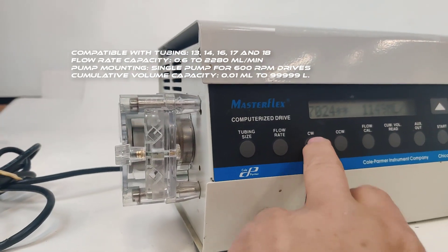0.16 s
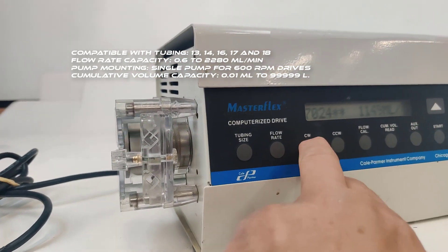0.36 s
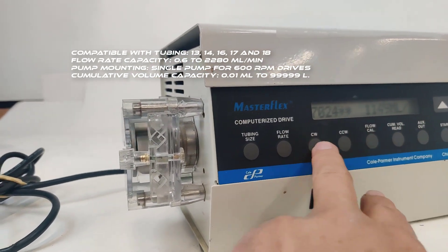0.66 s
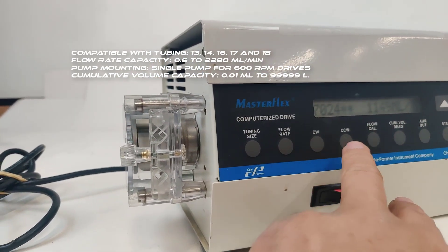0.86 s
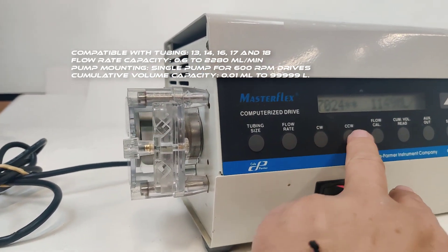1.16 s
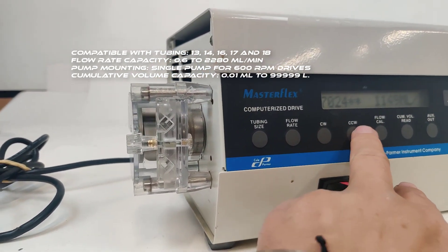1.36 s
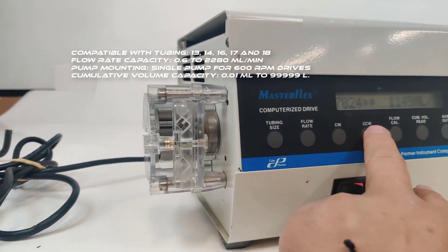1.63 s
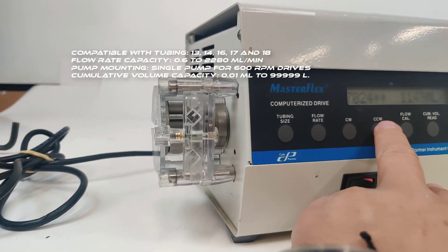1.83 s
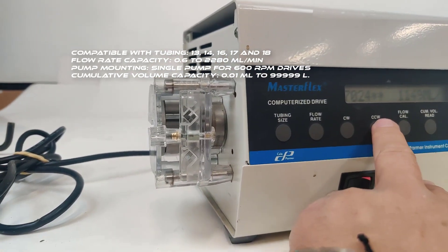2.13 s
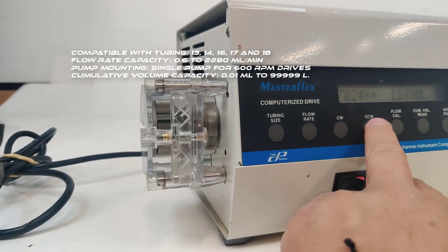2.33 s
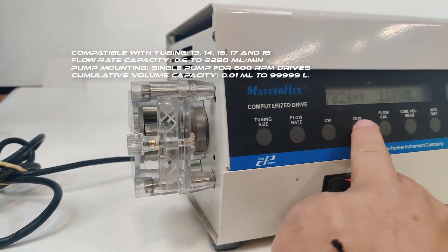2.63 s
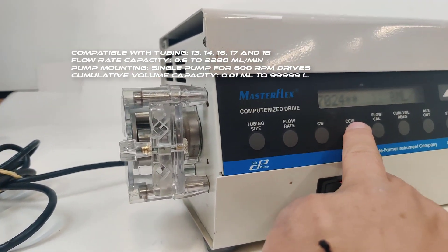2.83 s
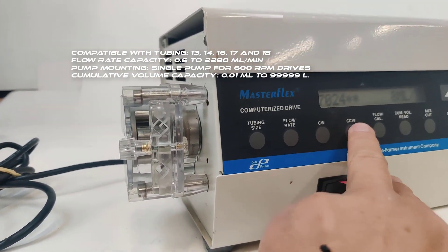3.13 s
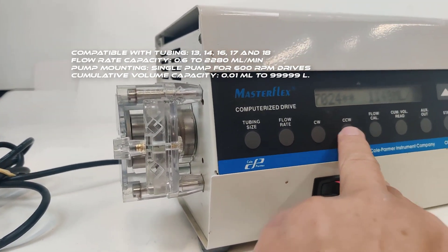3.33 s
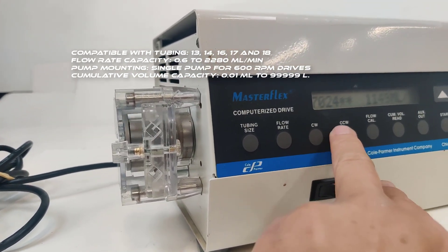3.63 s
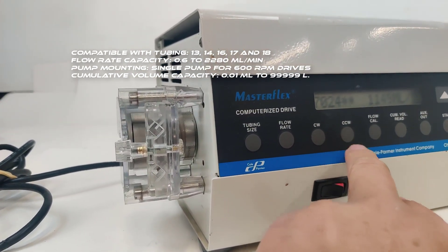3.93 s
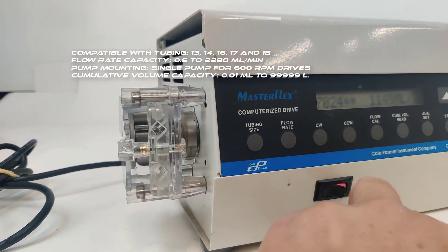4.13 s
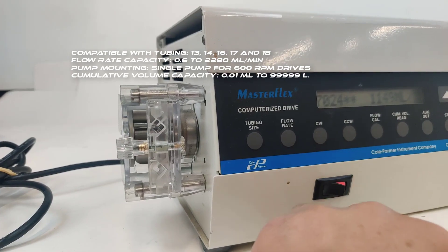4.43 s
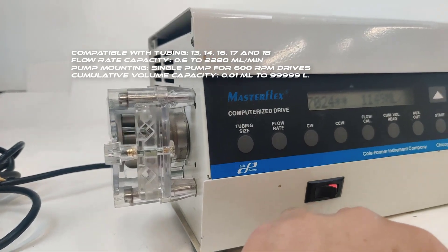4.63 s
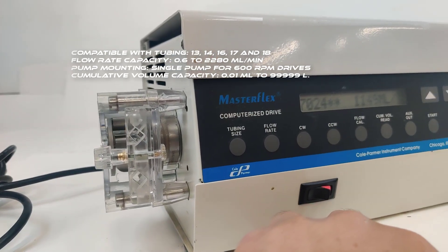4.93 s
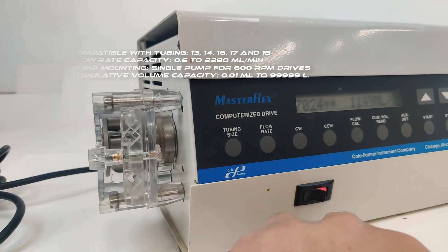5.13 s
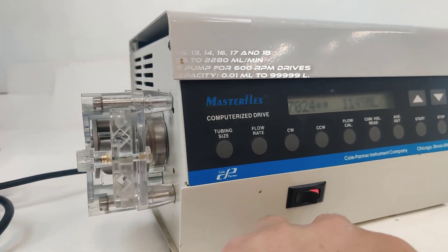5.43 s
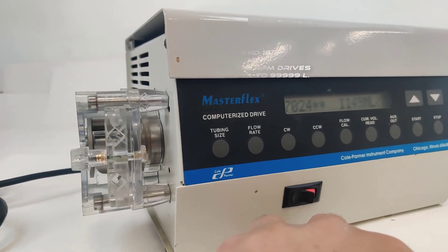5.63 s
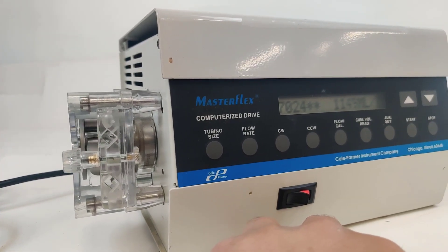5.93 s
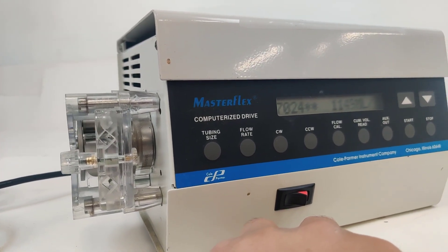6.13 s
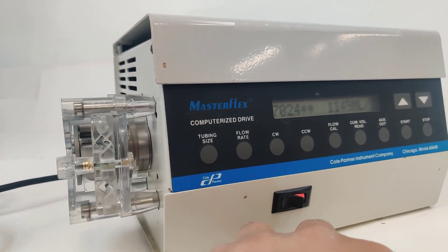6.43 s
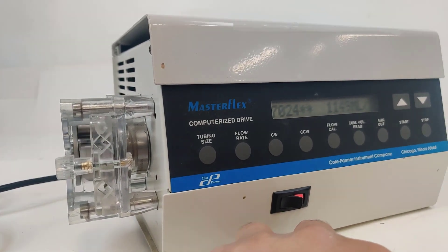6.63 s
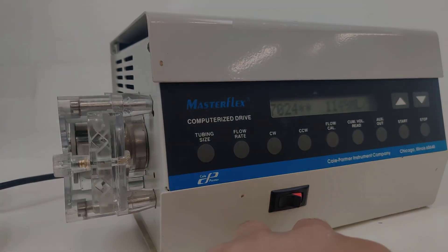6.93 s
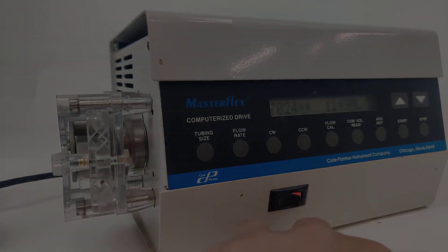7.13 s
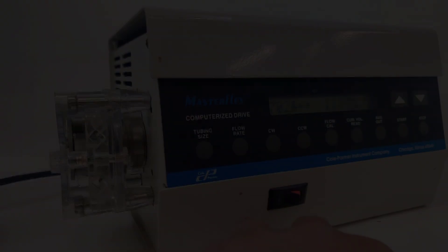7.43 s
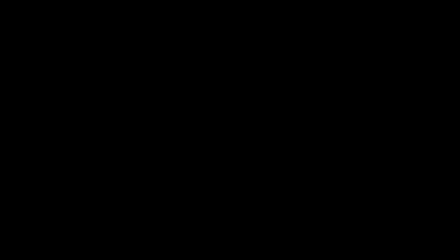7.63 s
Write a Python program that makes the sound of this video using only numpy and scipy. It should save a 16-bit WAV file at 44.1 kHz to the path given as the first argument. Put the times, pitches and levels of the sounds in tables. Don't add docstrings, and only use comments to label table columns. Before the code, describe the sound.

A small geared pump motor whines and rattles steadily, brakes with a metallic clunk, pauses, then restarts, rising in pitch to a steady run.

```python
import sys
import numpy as np
from scipy import signal
from scipy.fft import rfft, irfft, next_fast_len
from scipy.io import wavfile
from scipy.ndimage import uniform_filter1d, minimum_filter1d, map_coordinates

SR = 44100
rng = np.random.default_rng(int(sys.argv[2]) if len(sys.argv) > 2 else 0)


def gain_from_decibels(decibels):
    exponent = np.asarray(decibels, float) / 20
    return 10 ** exponent


def wrap_up_sound(samples):
    columns = np.atleast_2d(samples).T
    tamed = np.clip(columns, -1, 1)
    steps = np.round(tamed * 32767).astype(np.int16)
    wavfile.write(sys.argv[1], SR, steps)


N = 343253
T = np.arange(N) / SR
WAY = (T > 3).astype(int)
BRAKE, START = 2.635, 3.337
SHAFT_HZ, BALL_HZ = 38.883, 100.485
LOOSE = 0.62


def unit(x):
    return x / np.sqrt(np.mean(x ** 2) + 1e-20)


def along(points, hz):
    f, v = np.transpose(points)
    return np.interp(np.log(hz + 1), np.log(f + 1), v)


def wobble(rate, size=N):
    knots = rng.standard_normal(int(size * rate / SR) + 4)
    return map_coordinates(knots, [np.arange(size) * rate / SR])


def filtered(x, response):
    m = next_fast_len(N + 8192)
    return irfft(rfft(x, m) * response(np.fft.rfftfreq(m, 1 / SR)), m)[..., :N]


def swell(s, rise_s, fall_s):
    return np.exp(-np.where(T < s, ((T - s) / rise_s) ** 2, (T - s) / fall_s))


def put(track, s, sound):
    track[round(s * SR):][:len(sound)] += sound


def motion():
    # time in seconds, share of full speed.
    run_up = [
        (3.36, .03),
        (3.7, .34),
        (4.03, .68),
        (4.27, .95),
        (4.36, .99),
        (4.5, 1),
    ]
    speed = np.where(WAY, np.interp(T, *np.transpose(run_up)), 1)
    run = np.cumsum(speed) / SR
    return speed, np.where(WAY, run - run[-1], run)


def case(hz, way):
    # frequency in Hz, width in Hz, forward lift in dB, reverse lift in dB.
    modes = [(145, 8.4, 19.5, 22), (244.7, 39, 9.5, 12), (405, 26, 4, 10.5), (524, 32, 4, 6.5),
             (642.5, 21, 9, 12.5), (767, 19, 10, 9), (864, 22, -2.5, 8.5), (1022, 29, 7.5, 7),
             (1148, 16, 7, 10), (1827, 13, 4.5, 11.5), (1933, 7.6, 12.5, 9.5), (2196, 33, 11, 8),
             (2350, 35, 6.5, 14), (2530, 250, 6, 3.5), (4570, 75, 10.5, 11.5), (5400, 59, -7, -11.5),
             (3337, 56, -3, 8.5), (3550, 160, -1, 4.5), (3843, 28, 9.5, 12), (4817, 93, 11, 13.5),
             (5174, 63, 13, 16), (5470, 110, -16, 11.5), (6980, 230, 6.5, 1.5), (8290, 350, 5.5, 5.5),
             (10500, 700, 4, 6.5), (11770, 690, 8, 5), (5930, 190, -1, -4), (13870, 1400, 3.5, 4)]
    power = 1
    for mode_hz, width_hz, *lift_db in modes:
        power = power + gain_from_decibels(2 * lift_db[way]) / (1 + (2 * (hz - mode_hz) / width_hz) ** 2)
    return np.sqrt(power)


def hum(level_db=0.0, fizz_db=-58.5):
    mains_hz = 120.08
    # multiple of the mains line, forward level in dB, reverse level in dB.
    harmonics = [(1, -63, -69), (2, -49, -51), (3, -49, -50), (4, -42, -42), (5, -48, -46), (8, -60, -62)]
    stall_db = [-6, -6, -1, -8, -12, -19]
    slow = 1 - motion()[0]
    buzz = np.zeros(N)
    for (k, *db), stall in zip(harmonics, stall_db):
        buzz += gain_from_decibels(np.array(db)[WAY] + stall * slow) * np.cos(2 * np.pi * (k * mains_hz * T + rng.random()))
    buzz *= np.sqrt(2) * gain_from_decibels(level_db + 0.41 * wobble(9.6) + 0.66 * slow * wobble(23.0))
    chops = rng.standard_normal(N) * (1 + .5 * np.cos(2 * np.pi * mains_hz * T))
    plates = lambda hz: 1 / (1 + ((hz - 3450) / 210) ** 4) + .35 / (1 + ((hz - 1300) / 600) ** 4)
    fizz = unit(filtered(chops, plates))
    switched_on = np.clip((T - START) / 0.034, 0, 1)
    switched_off = gain_from_decibels(-60 * np.maximum(T - BRAKE, 0) / 0.062)
    return np.where(WAY, switched_on, switched_off) * (buzz + gain_from_decibels(fizz_db) * fizz)


def lines(unsteady_db=.5, level_db=-.5, weakest_db=-65):
    # multiple of the part's rate, forward level in dB, reverse level in dB.
    shaft = [(1, -52, -55), (10, -45, -42), (20, -51, -46), (60, -55, -48), (63, -70, -55), (79, -64, -60),
             (86, -68, -56), (88, -64, -63), (99, -70, -63), (119, -70, -64), (133, -70, -63),
             (139, -70, -64), (140, -70, -64), (142, -70, -64), (91, -53, -62), (92, -56, -69),
             (94, -58, -68), (96, -59, -72), (100, -68, -55), (101, -70, -57), (115, -69, -60),
             (118, -69, -60), (124, -68, -60), (127, -67, -57), (128, -70, -62)]
    balls = [(4, -39, -36), (5, -49, -49), (6, -52, -58), (7, -60, -69), (18, -60, -62), (19, -58, -62),
             (23, -55, -59)]
    cage = [(18, -55, -52), (19, -52, -56), (20, -58, -60), (22, -53, -64), (23, -48, -52), (25, -51, -58),
            (26, -53, -60), (27, -56, -66)]
    gear = [(3, -36, -34), (4, -49, -60)]
    rotor = [(24, -64, -58), (49, -54, -63), (50, -56, -67), (66, -58, -54), (81, -58, -56), (83, -59, -59),
             (85, -55, -55), (86, -57, -54), (105, -49, -56), (106, -51, -41), (107, -60, -48),
             (108, -57, -47), (109, -53, -46)]
    # frequency at full speed in Hz, forward level in dB,
    # reverse level in dB.
    drive_lines = [(148.6, -60, -64), (226.7, -57, -65), (343.3, -55, -56), (364.9, -65, -57), (370.9, -59, -56),
                   (395.55, -54, -53), (396.9, -50, -60), (408.9, -52, -70), (403.7, -70, -51), (406.8, -54, -52),
                   (412.8, -50, -60), (478.6, -61, -51), (629, -50, -47), (664, -57, -60), (858.4, -54, -55),
                   (1010.9, -61, -65), (1022.9, -66, -58), (1791.6, -61, -59), (1849.9, -57, -67),
                   (1900.1, -50, -59), (1928.8, -55, -61), (2037.2, -57, -57), (2065.3, -65, -52),
                   (2202.2, -61, -59), (2270.8, -61, -52), (2338, -70, -48), (2368.7, -63, -54),
                   (2475.2, -70, -55), (2885.9, -56, -65), (2612.5, -56, -59), (2770.8, -60, -69),
                   (2536.2, -62, -59), (2193.3, -55, -58),
                   (234.5, -59, -70), (462.5, -70, -58), (515, -58, -56), (547, -70, -59), (706, -62, -70),
                 (752.1, -61, -70), (783.6, -70, -63), (963, -64, -70), (1058.7, -70, -64),
                 (1320.8, -63, -70), (1411.6, -70, -63), (1435.2, -64, -70), (1794.6, -61, -70),
                 (1812.5, -62, -70), (1880.6, -70, -63), (2124.8, -62, -62), (2173.7, -70, -61),
                 (2309.7, -70, -51), (2340, -57, -70), (2447.8, -61, -70), (2455.3, -60, -70),
                 (2748.1, -70, -64), (2871.3, -63, -70), (3110.5, -64, -70), (3172.6, -70, -64),
                 (3362.2, -62, -61), (3661.2, -63, -70), (3810.4, -63, -70)]
    angles = {"balls": (.075, -.03), "gear": (.097, -.076), "shaft": (-.041, .031), "rotor": (.09, .21)}
    cage_hz, gear_hz, rotor_hz = 14.3, 136.78, 5.982
    gear_slip_hz = .044
    gear_warms_db_per_s = 2.2
    warms_db_per_s = 0.28
    radiates_hz = 265

    speed, turning = motion()
    turning = turning + 0.0043 * (1 - speed) * wobble(30)
    grid = np.arange(6000.) + 1
    lift = case(grid, way=1) / (1 + (radiates_hz / grid) ** 4)
    sway = [gain_from_decibels(unsteady_db * wobble(3.36) + 3.3 * (1 - speed) * wobble(20)) for _ in range(3)]
    parts = [(shaft, SHAFT_HZ, 0, "shaft"), (balls, BALL_HZ, 0, "balls"), (cage, BALL_HZ, cage_hz, 0),
             (gear, gear_hz, 0, "gear"), (rotor, rotor_hz, 0, "rotor"), (drive_lines, 1, 0, 0)]
    out = np.zeros(N)
    for way, running in enumerate((T < BRAKE + .15, T > START)):
        first = np.argmax(running)
        on = slice(first, first + running.sum())
        for table, base, offset, name in parts:
            for i, row in enumerate(table):
                if row[1 + way] <= weakest_db:
                    continue
                is_gear = name == "gear"
                hz = row[0] * (base - gear_slip_hz * way * is_gear) + offset
                start = row[0] * angles[name][way] if name else rng.random()
                gain = gain_from_decibels(row[1 + way]) * lift[(hz * speed[on]).astype(int)] / lift[int(hz)]
                if is_gear and not way:
                    gain = gain * gain_from_decibels(gear_warms_db_per_s * (T[on] - 1.6))
                out[on] += gain * sway[i % len(sway)][on] * np.cos(2 * np.pi * (hz * turning[on] + start))
    stop = gain_from_decibels(-60 * np.maximum(T - BRAKE, 0) / 0.11)
    warming_db = warms_db_per_s * (T - np.where(WAY, 6, 1.3))
    return np.sqrt(2) * gain_from_decibels(level_db + warming_db) * out * np.where(WAY, speed ** 2.7, stop)


def effort():
    # drone, body, whine and hiss in dB.
    full_db = [
        (-45, -43.5, -33.5, -50),
        (-46, -44.5, -34.5, -48),
    ]
    # time in seconds, jump in dB.
    jolts = [
        (2.08, 4),
        (2.624, 4),
        (3.606, 5),
        (3.942, 1.5),
        (4.208, 3.5),
        (6.39, 5),
    ]
    column = lambda values: np.array(values)[:, None]
    grows = column((0.78, 2, 1.25, 0.96))
    coast_db_per_s = column((169, 190, 194, 150))
    jolt_share = column((.3, 1.6, 0.57, 0.21))
    slack_db, catch_s = column((5, 7.5)), 3.97
    hiss_late_db = 8

    speed = motion()[0]
    jolt_db = sum(db * swell(s, rise_s=0.016, fall_s=0.017) for s, db in jolts)
    rising_db = grows * 20 * np.log10(np.minimum(speed / LOOSE, 1))
    rising_db[2:] -= slack_db * WAY * np.clip((catch_s - T) / 0.12, 0, 1)
    rising_db[3] -= hiss_late_db * (1 - speed) * (T > catch_s)
    falling_db = coast_db_per_s * np.maximum(T - BRAKE, 0) * (1 - WAY)
    return np.transpose(full_db)[:, WAY] + rising_db - falling_db + jolt_share * jolt_db


def rattle():
    # frequency in Hz, density in dB per Hz.
    forward = [(88, -65), (150, -27.5), (314, -10.5), (404, -5), (550, -14.5), (631, -9.5), (708, -17.5),
               (1270, -17), (2270, -16), (3690, -15.5), (4220, -26.5), (5030, -27.5), (5990, -36.5),
               (11800, -54), (15500, -53)]
    reverse = [(88, -68), (150, -29), (314, -14.5), (404, -8), (550, -15), (631, -9), (708, -19.5),
               (930, -21), (1600, -17.5), (2360, -18), (2920, -17.5), (5030, -28.5), (5990, -34),
               (10500, -49.5), (15500, -57.5)]
    cover_hz = 6000
    whine_in_s, whine_late_db = 3, 7
    drone_db, body_db, mid_db, hiss_db = effort()
    turning = motion()[1]
    beat = lambda hz, shift: np.cos(2 * np.pi * (hz * turning + shift))
    under = lambda hz, edge_hz: 1 / (1 + (hz / edge_hz) ** 8)
    clatter = beat(13.3, .15) + .6 * beat(6.6, .1) + 1.2 * wobble(25) + 1.6 * wobble(200)
    spin = 0.75 * beat(SHAFT_HZ, 0.11) + 0.75 * beat(2 * SHAFT_HZ, .3)
    late_db = whine_late_db * WAY * np.clip((whine_in_s - T) / 0.066, 0, 1)
    noise = rng.standard_normal((2, N))
    out = np.zeros((2, N))
    for way, spectrum in enumerate((forward, reverse)):
        shaken = filtered(noise, lambda hz: gain_from_decibels(along(spectrum, hz)) * case(hz, way))
        drone = filtered(shaken, lambda hz: under(hz, 762))
        body = filtered(shaken, lambda hz: under(hz, 1795) - under(hz, 738))
        whine = filtered(shaken, lambda hz: under(hz, 4570) - under(hz, 1690))
        cover = filtered(shaken, lambda hz: under(hz, cover_hz) - under(hz, 4650))
        hiss = filtered(shaken, lambda hz: 1 - under(hz, cover_hz))
        ball_db = (1.6, .3)[way] * beat(BALL_HZ, 0)
        part = drone / np.std(body) * gain_from_decibels(drone_db + 0.8 * wobble(14))
        part += unit(body) * gain_from_decibels(body_db + .5 * clatter)
        part += unit(whine) * gain_from_decibels(mid_db - 5.0 - late_db + .5 * clatter + ball_db)
        part += cover / np.std(whine) * gain_from_decibels(mid_db - 4.5 + 0.55 * clatter + spin)
        part += unit(hiss) * gain_from_decibels(hiss_db - 0.5 + .5 * clatter + spin)
        out += (WAY == way) * part
    return out * np.interp(T, [2.68, 2.76, START, START + 0.024], [1, 0, 0, 1])


def bench_rumble():
    # frequency in Hz, density in dB per Hz.
    bench = [(8.8, -32), (15, -4), (48, -3.5), (64, -3), (113, -11), (152, -6), (198, -21), (231, 3),
             (300, -3), (390, -33), (660, -120)]
    # time in seconds, lift over the rumble in dB (negative
    bumps = [(.24, 2.5), (.68, 6), (1.06, 8), (1.4, 8), (1.53, 18.5), (1.68, 17), (2.39, 0), (2.64, 6),
             (2.82, 2), (2.98, -1), (3.11, 4), (3.2, -6), (3.55, 8), (3.8, 7), (3.93, -2), (4.3, 6),
             (4.55, 7), (4.72, 5), (4.89, -3), (5.72, 6)]
    on_db, off_db, settle_s, sway_db, bump_s = -55, -65.5, 0.46, 1, 0.053
    noise = rng.standard_normal((2, N))
    thrum = unit(filtered(noise, lambda hz: gain_from_decibels(along(bench, hz)) * (hz < 200)))
    settling = swell(BRAKE, 1e6, settle_s / 2)
    running = np.where(WAY, np.minimum(motion()[0] / LOOSE, 1), settling)
    bumps_db = sum(db * np.exp(-((T - s) / bump_s) ** 2) for s, db in bumps)
    return thrum * gain_from_decibels(off_db + (on_db - off_db) * running + bumps_db + sway_db * wobble(9.1))


def cover_knocks():
    # time in seconds, peak in dB, ring in dB.
    roller_knocks = [(0.3083, -30, -6.5), (0.4, -32, -22), (0.453, -28, -10), (0.6024, -32.5, -6),
                     (0.8884, -30, -5), (1.032, -30, -8.5), (1.244, -29.5, -8), (1.328, -31, -3.5),
                     (1.48, -30.5, -5.5), (1.7974, -38, -3), (2.154, -43.5, -19), (2.3943, -33, -6),
                     (2.5464, -33.5, -4), (2.5816, -29, -6), (3.589, -36, -27), (3.9394, -30, -10),
                     (4.0107, -35.5, 0), (4.047, -22.5, -21), (4.0976, -28, -22), (4.7493, -45, -13),
                     (5.409, -25, -30), (5.8344, -31, -17), (6.39, -34, 2.5), (6.46, -25, -17),
                     (6.9404, -31, -12), (7.5374, -30.5, -16),
                     (0.061, -28, -17), (0.203, -31.5, -18), (0.6615, -30.5, -16), (0.7372, -31, -15),
                  (0.912, -27, -16), (1.1827, -41.5, -14), (1.202, -37, -14), (1.3875, -27, -14),
                  (1.6262, -37, -12.5), (1.8243, -37, -15), (1.9098, -30.5, -14), (2.464, -36, -15),
                  (2.5052, -34, -12), (3.551, -43, -17), (3.698, -42, -15), (4.365, -31, -12),
                  (4.4713, -41, -14), (4.564, -34.5, -16), (4.8227, -27, -14), (4.9731, -25.5, -21),
                  (5.2077, -30, -15), (5.2689, -27.5, -15), (5.3423, -36, -13), (5.6895, -33, -16),
                  (5.7185, -30, -13), (5.7964, -32, -12), (5.9693, -29, -16.5), (6.0814, -30.5, -9),
                  (6.1408, -30.5, -12.5), (6.2053, -32, -4), (6.559, -28, -14), (6.6109, -31.5, -14),
                  (6.8417, -35.5, -15), (7.0618, -30.5, -9), (7.1284, -35, -11.5), (7.203, -31, -10),
                  (7.227, -31.5, -11), (7.2963, -38, -19), (7.515, -26, -14.5)]
    ring_hz, ring_spread_hz = 7300, 150
    t = np.arange(SR // 3) / SR
    blip = (1 - np.exp(-t / 0.001)) * (gain_from_decibels(-60 * t / 0.021) + gain_from_decibels(-3.0 - 60 * t / 0.091))
    rings, bursts = np.zeros((2, N + SR))
    for s, db, ring_db in roller_knocks:
        hz = ring_hz + ring_spread_hz * rng.standard_normal()
        chance = rng.standard_normal((2, len(t)))
        put(bursts, s, gain_from_decibels(db - 8.5) * blip * chance[0])
        phase = 2 * np.pi * hz * t + .18 * np.cumsum(chance[1])
        put(rings, s, gain_from_decibels(db + ring_db - 6) * blip * np.sin(phase))
    out = rings[:N]
    for way, (knock_hz, width_hz) in enumerate([(4880, 480), (4980, 350)]):
        peak = lambda hz: 4.7 / (1 + ((hz - knock_hz) / width_hz) ** 4)
        wide = lambda hz: 0.2 * (hz > 1500) / (1 + (hz / 9000) ** 4)
        out = out + filtered(bursts[:N] * (WAY == way), lambda hz: peak(hz) + wide(hz))
    return out


def key_clicks():
    # time in seconds, level in dB, dullness in samples.
    presses = [
        (.2385, -27.5, 2),
        (3.067, -54, 3),
        (3.0735, -51, 6),
        (3.0895, -51, 2),
        (3.118, -56, 4),
    ]
    t = np.arange(SR // 3) / SR
    out = np.zeros(N + SR)
    for s, db, dull in presses:
        snap = uniform_filter1d(rng.standard_normal(len(t)), size=dull)
        put(out, s, gain_from_decibels(db - 60 * t / 0.004) * unit(snap))
    return out[:N]


def surges():
    # time in seconds, frequency in Hz, level in dB.
    surge_tones = [(3.105, 640, -65), (3.82, 626, -33), (4.03, 287.4, -32.5), (4.09, 632, -26),
                   (4.28, 393, -34), (.79, 150, -40), (1.74, 75, -42), (2.4, 159, -42), (2.73, 506, -52),
                   (3.75, 410, -45), (3.83, 420, -38), (3.91, 396, -33), (3.87, 492, -41), (4.12, 500, -42),
                   (3.95, 476, -38.5), (3.98, 637, -32.5), (4.02, 150, -46), (4.04, 399, -36.5),
                   (4.21, 635, -31), (4.24, 150, -42.5)]
    return sum(gain_from_decibels(db) * np.exp(-((T - s) / 0.033) ** 2) * np.sin(2 * np.pi * hz * T) for s, hz, db in surge_tones)


def brake_clunk():
    # time in seconds, level in dB.
    blows = [
        (2.6207, -28.5),
        (2.6245, -26.5),
        (2.636, -34.5),
        (2.652, -44.5),
        (2.69, -62),
    ]
    # frequency in Hz, level in dB, time to fall by 90 dB in seconds.
    shell = [(543, -31, 0.14), (761, -8, 0.2), (1520, -18.5, 0.2), (2550, -31, 0.3), (3330, -18.5, 0.19),
             (3540, -7.5, 0.18), (5000, -4.5, 0.098), (7330, -5.5, 0.055), (9700, -41, 0.19),
             (9916, -41, 0.07)]
    t = np.arange(SR // 3) / SR
    rings, bursts = np.zeros((2, N + SR))
    for s, db in blows:
        for hz, level, fall_90_s in shell:
            decay = gain_from_decibels(level + rng.normal(0, 2.3) - 90 * t / fall_90_s)
            put(rings, s, gain_from_decibels(db) * decay * np.sin(2 * np.pi * hz * t))
        put(bursts, s, gain_from_decibels(db + 5.0 - 60 * t / 0.087) * rng.standard_normal(len(t)))
    crash = filtered(bursts[:N], lambda hz: 1 / (1 + (hz / 5000) ** 3) / (1 + (400 / (hz + 1)) ** 3))
    return rings[:N] + crash


def resting_room():
    # frequency in Hz, density in dB per Hz.
    quiet = [(88, -33), (150, -15), (221, 3.5), (509, -6), (643, -4.5), (1130, -16.5), (1660, -12),
             (4140, -15), (5100, -12), (5700, -22.5), (7130, -27), (11000, -30.5), (15500, -33.5)]
    # start in seconds, length in seconds, low level in dB, high
    # level in dB.
    strokes = [
        (3.042, 0.082, -68, -71),
        (3.105, 0.085, -77, -70),
        (3.252, 0.064, -82, -79),
        (3.322, 0.082, -62, -70),
    ]
    still_db, echo_db, echo_db_per_s = (-68, -74.5), (-54.5, -52), (106, 91)
    stroke_edge_s = 0.022
    noise = rng.standard_normal((2, 2, N))
    low = unit(filtered(noise[0], lambda hz: gain_from_decibels(along(quiet, hz)) * (hz < 1200)))
    high = unit(filtered(noise[1], lambda hz: gain_from_decibels(along(quiet, hz)) * (hz >= 1200))) * gain_from_decibels(wobble(69))
    since = np.maximum(T - 2.7, 0)
    out = np.zeros((2, N))
    for k, layer in enumerate((low, high)):
        level = gain_from_decibels(still_db[k]) + gain_from_decibels(echo_db[k] - echo_db_per_s[k] * since)
        for s, length, *db in strokes:
            level = level + gain_from_decibels(db[k]) * np.clip(np.minimum(T - s, s + length - T) / stroke_edge_s, 0, 1)
        out += layer * level
    return out * np.interp(T, [2.66, 2.72], [0, 1])


def ports(common, apart):
    # frequency in Hz, side share.
    lean = [(100, .03), (400, -.04), (630, .06), (780, .22), (950, .18), (1150, .37), (1400, .48),
            (1650, .8), (1850, .4), (2200, .3), (2330, .6), (2500, -.1), (2700, .23), (2950, -.2),
            (3200, -.9), (3600, -.7), (3850, -.2), (4200, -.2), (4600, .34), (4850, .45), (5150, .14),
            (5450, -.4), (6600, -.7), (8300, -.8), (9500, -.13), (11000, -.27), (13000, -.08)]
    lead = [(100, .03), (400, .12), (480, 0), (630, -.16), (780, .24), (950, .33), (1400, .42), (1650, 0),
            (1850, .17), (2200, .14), (2330, -.5), (2500, -.3), (2700, .34), (2950, .15), (3300, -.1),
            (3850, -.22), (4200, -.08), (4600, -.4), (4850, -.4), (5150, -.12), (6000, .04), (13000, 0)]
    # frequency in Hz, side share.
    scatter = [(500, 0), (1000, .3), (1600, .55), (15000, .6)]
    # frequency in Hz, level in dB.
    unrelated = [(60, -19), (400, -17), (480, -13), (630, -7), (780, -5.5), (950, -6), (1400, -1),
                 (1650, 4), (1900, -4), (2200, 1), (2330, -2), (2500, 1), (3200, 0), (4200, 0), (5150, -3),
                 (8300, -4), (9500, -1), (15000, 0)]
    knots = rng.standard_normal(300)
    echo = lambda hz: along(scatter, hz) * np.tanh(2 * map_coordinates(knots, [hz / 80]))
    side = filtered(common, lambda hz: along(lean, hz) + 1j * (along(lead, hz) + echo(hz)))
    side = side + filtered(apart, lambda hz: gain_from_decibels(along(unrelated, hz)))
    return np.array([common + side, common - side])


def scene():
    shake = rattle() + bench_rumble() + resting_room()
    strikes = cover_knocks() + key_clicks() + surges() + brake_clunk()
    return ports(hum() + lines() + strikes + shake[0], shake[1])


def starved(x, uneven_db=1.5, top_uneven_db=3.8, leak_db=-21, exact=.33, floor_db=-33):
    # frequency in Hz, step in dB over the 6-8.6 kHz level.
    coarse = [(1500, -14), (3000, -4), (4500, 0), (8000, 1), (9000, -2), (12000, -2), (13000, -1),
              (14400, 0), (15500, 6)]
    size, lead = 1024, 1024 - 563
    basis = np.cos(np.pi / size * np.outer(np.arange(2 * size) + (size + 1) / 2, np.arange(size) + .5))
    basis = basis * signal.windows.kaiser_bessel_derived(2 * size, 4 * np.pi)[:, None]
    blocks = np.pad(x, ((0, 0), (lead, 2 * size - (N + lead) % size))).reshape(2, -1, size)
    values = np.concatenate([blocks[:, :-1], blocks[:, 1:]], axis=2) @ basis
    hz = (np.arange(size) + .5) * SR / 2 / size

    treble = values[..., (hz > 6000) & (hz < 8600)]
    level = np.sqrt(np.mean(treble ** 2, axis=(0, 2)) + 1e-20)[:, None]
    level = minimum_filter1d(uniform_filter1d(level, size=3, axis=0), size=3, axis=0)
    frames = rng.random((len(level), 2))
    patches = np.repeat(rng.standard_normal((len(level), size // 16)), 16, axis=1) * (hz > 12000)
    step_db = along(coarse, hz) + uneven_db * 2 * (frames[:, :1] - .3) + top_uneven_db * patches
    step = level * gain_from_decibels(step_db)
    step = np.maximum(step, gain_from_decibels(floor_db + top_uneven_db * patches) * (hz > 11300))

    snapped = np.sign(values) * step * np.floor(abs(values) / step + .4)
    leak = gain_from_decibels(leak_db) * (frames[:, 1:] > exact) * (hz < 12500)
    error = (snapped - values) * (1 - leak) * (hz > coarse[0][0])
    halves = (error @ basis.T * 2 / size).reshape(2, -1, 2, size)
    first = np.pad(halves[:, :, 0], ((0, 0), (0, 1), (0, 0)))
    second = np.pad(halves[:, :, 1], ((0, 0), (1, 0), (0, 0)))
    return x + (first + second).reshape(2, -1)[:, lead:lead + N]


def top_cut(x):
    return signal.sosfilt(signal.butter(12, 15680, fs=SR, output="sos"), x)


def record(dry):
    after = np.maximum(T - 7.646, 0)
    gain = gain_from_decibels(-26 * np.minimum(after / .001, 1) - 60 * (after / .034) ** 2)
    tail = dry * (after > 0) * gain_from_decibels(-14 - 30 * (after / .02) ** 3)
    smear = filtered(tail, lambda hz: 1 / (1 + ((hz - 2700) / 1100) ** 6))
    mix = starved(dry * gain + smear)
    return top_cut(mix)


dry = scene()
out = record(dry)
wrap_up_sound(out)
```